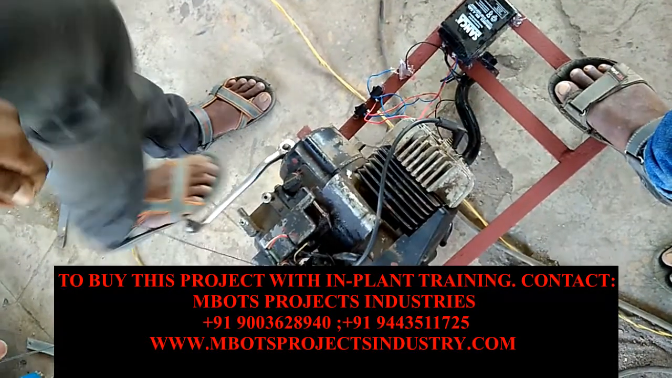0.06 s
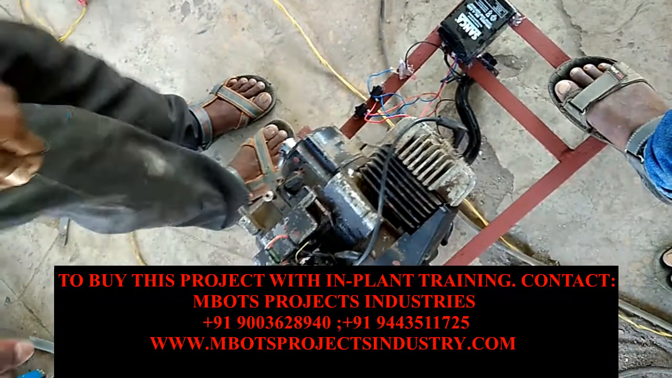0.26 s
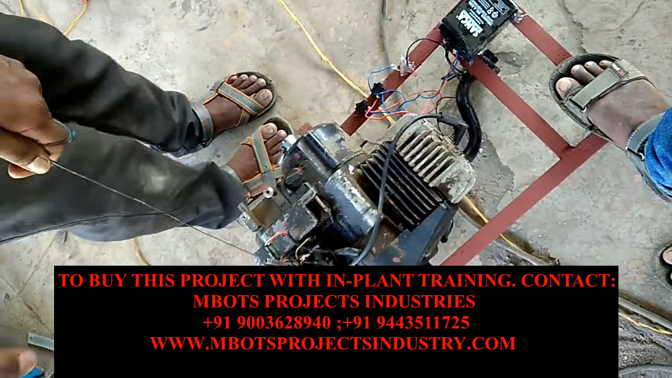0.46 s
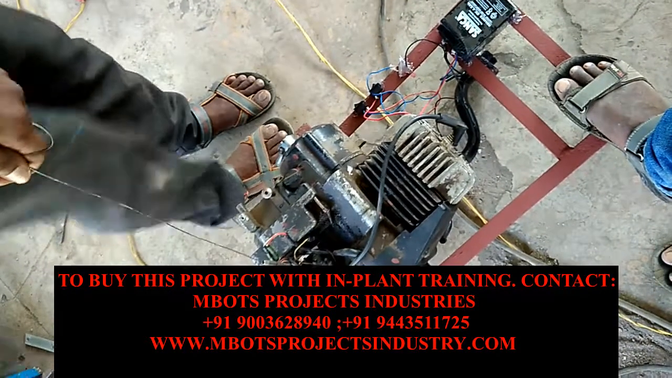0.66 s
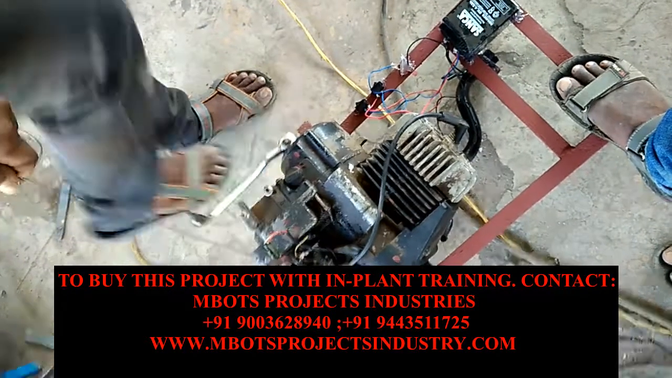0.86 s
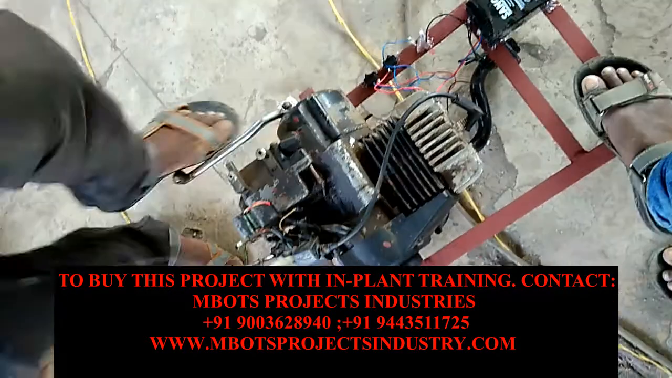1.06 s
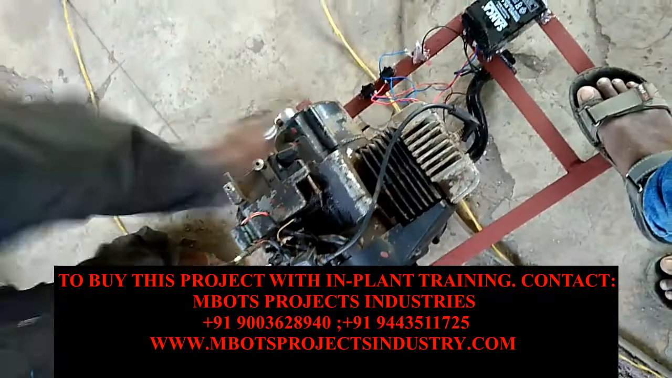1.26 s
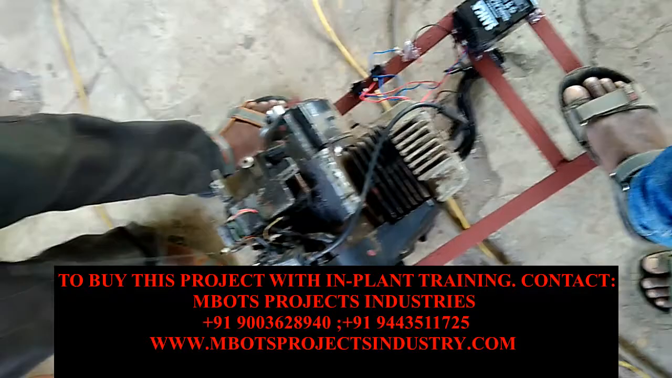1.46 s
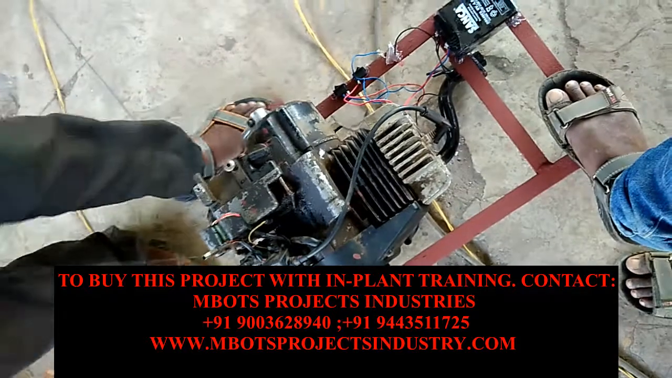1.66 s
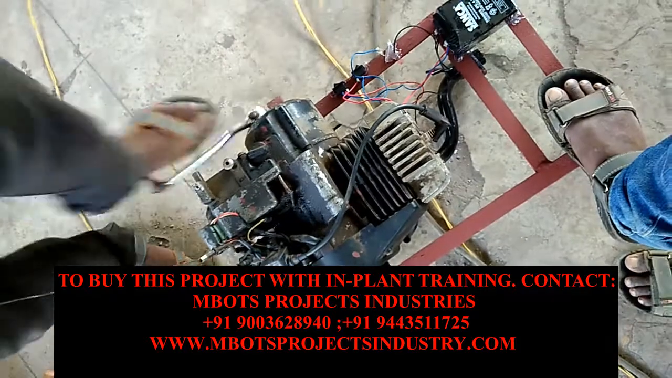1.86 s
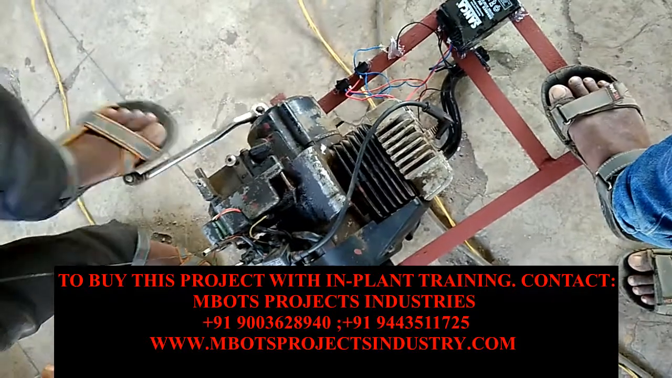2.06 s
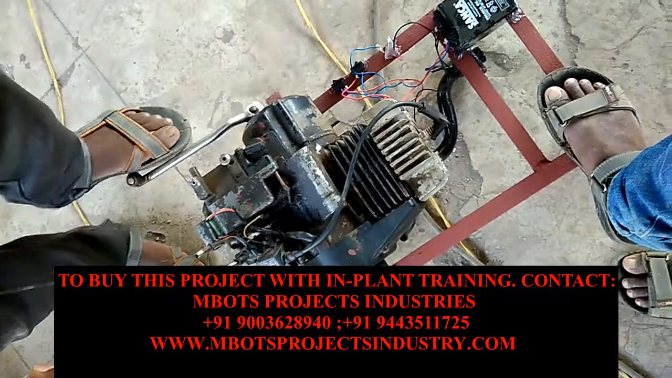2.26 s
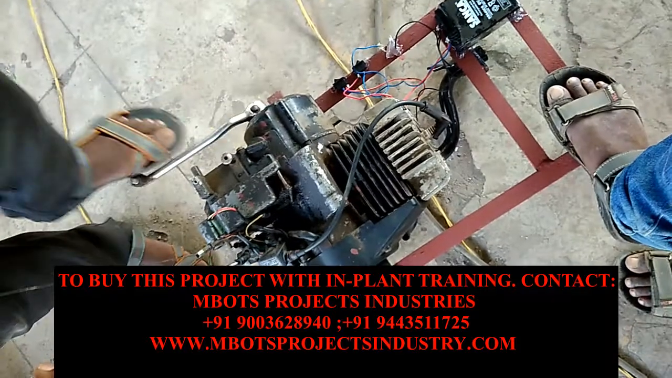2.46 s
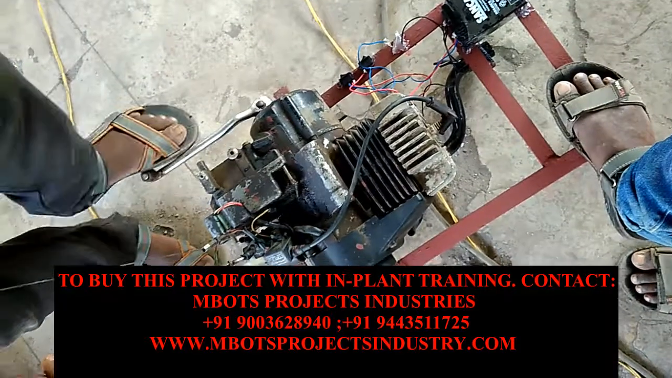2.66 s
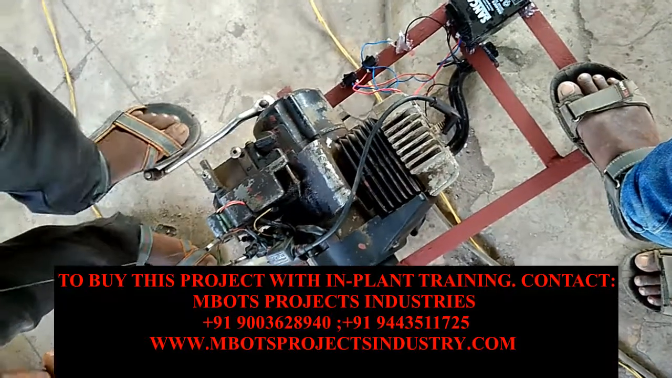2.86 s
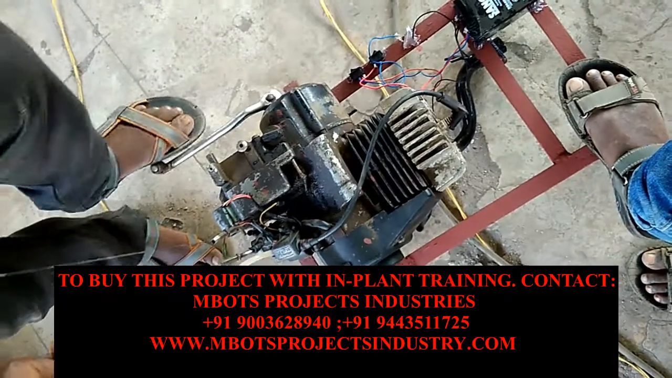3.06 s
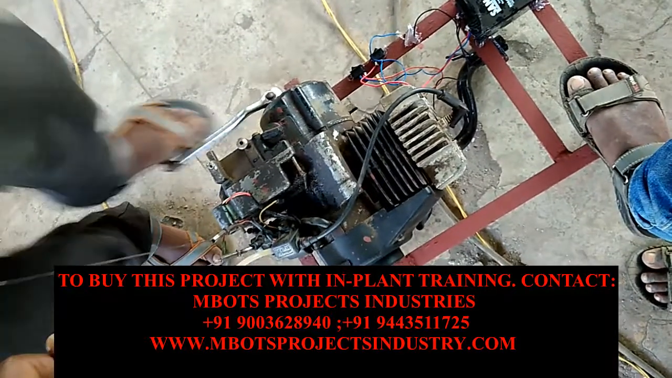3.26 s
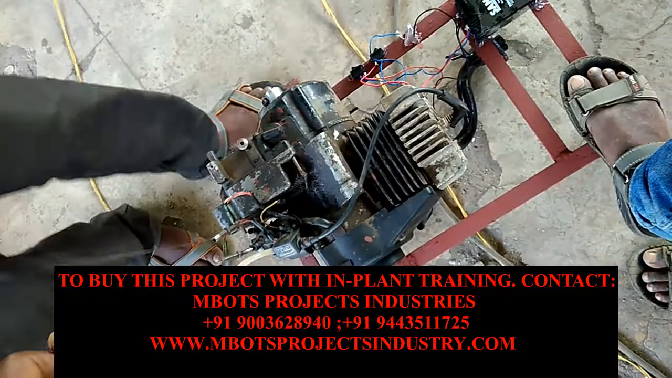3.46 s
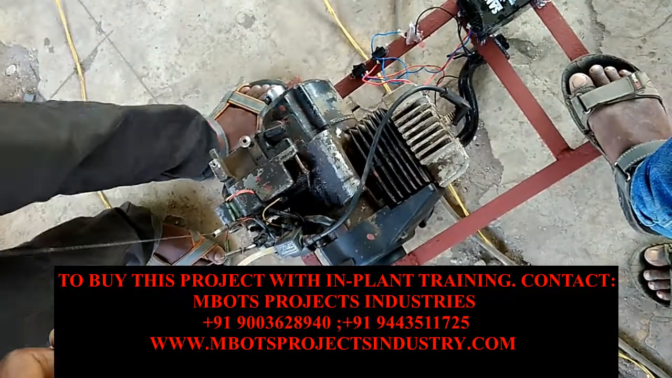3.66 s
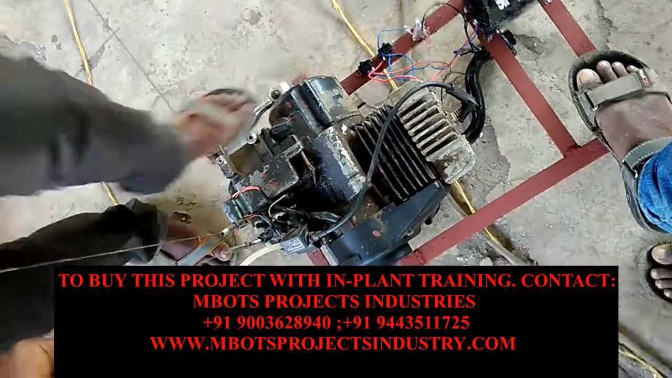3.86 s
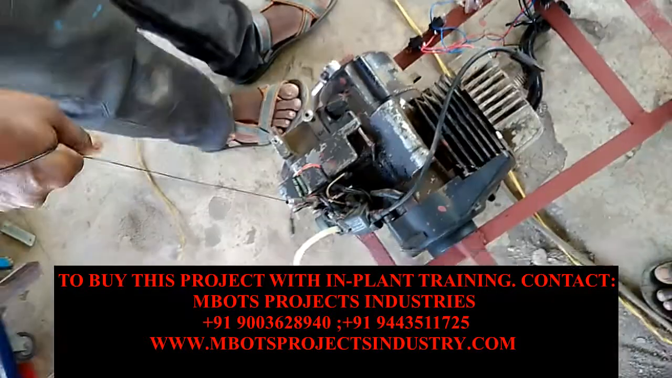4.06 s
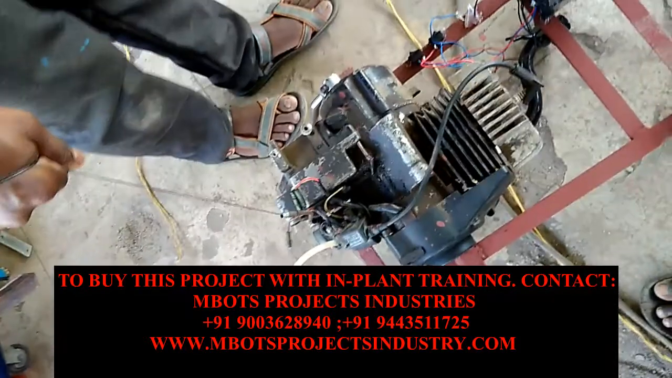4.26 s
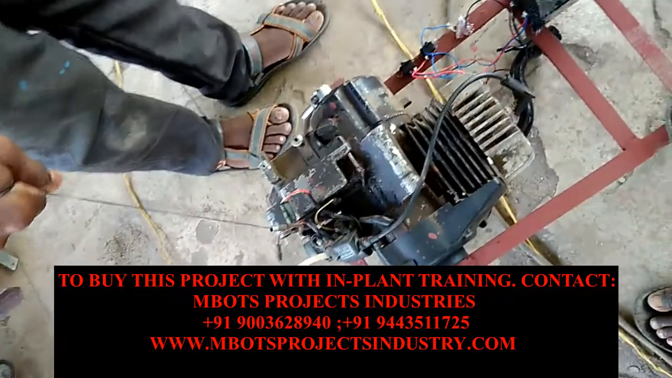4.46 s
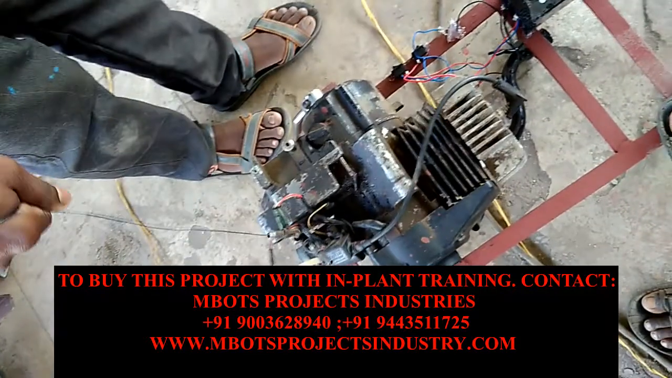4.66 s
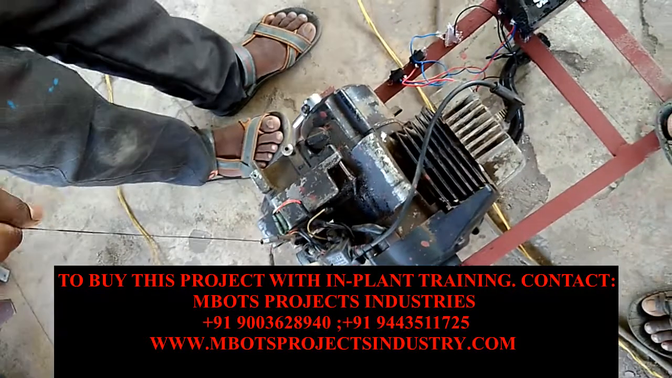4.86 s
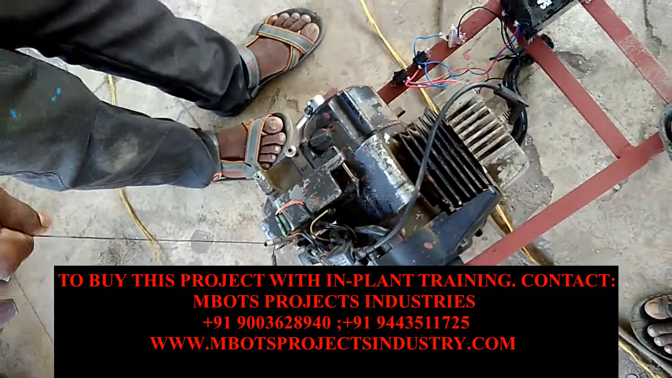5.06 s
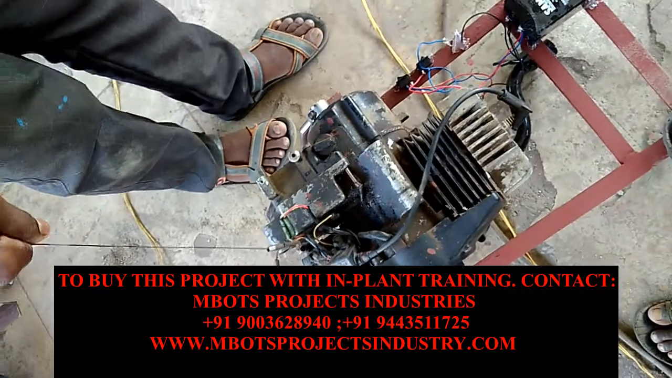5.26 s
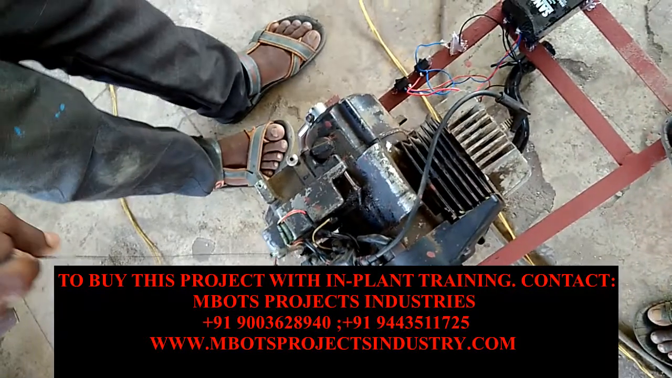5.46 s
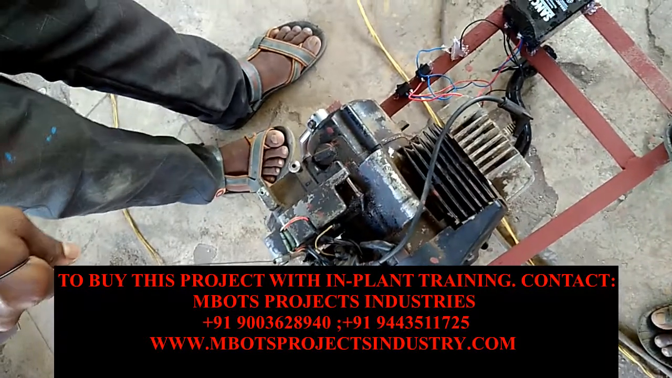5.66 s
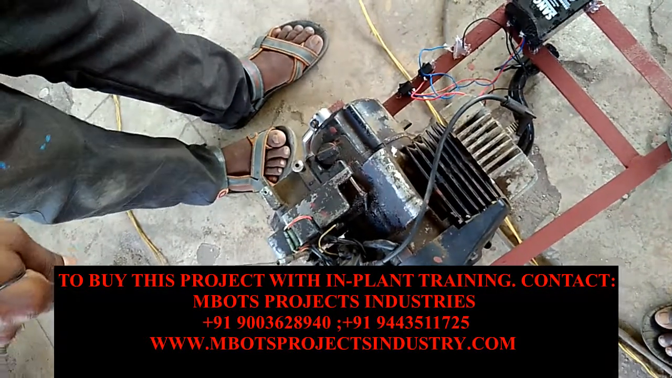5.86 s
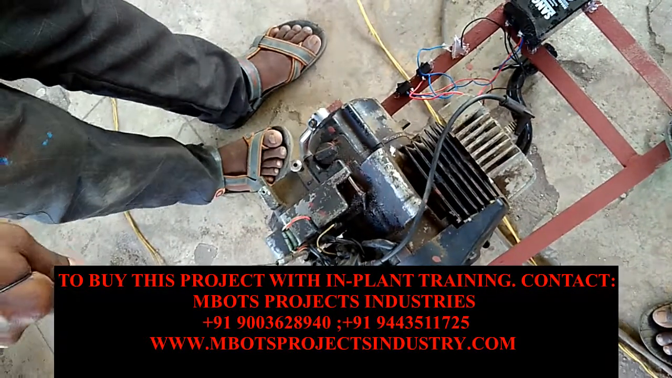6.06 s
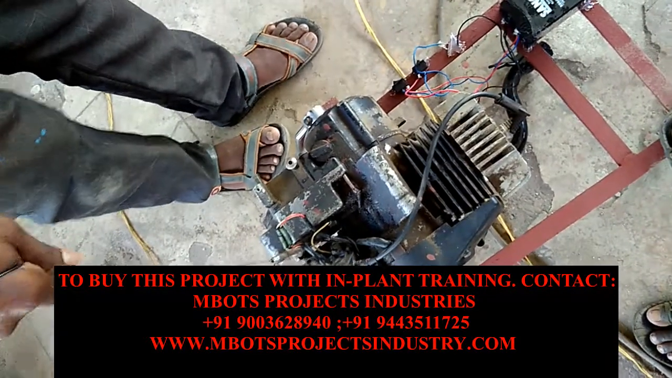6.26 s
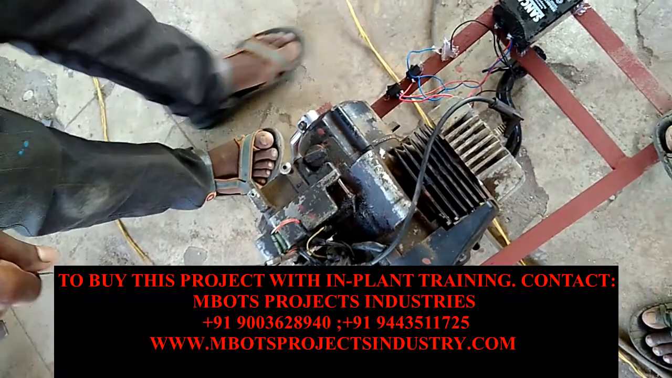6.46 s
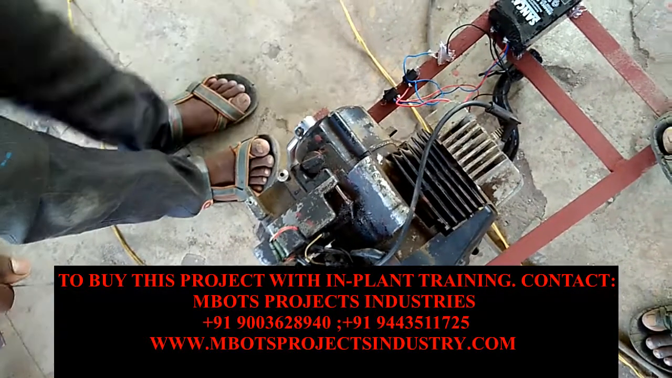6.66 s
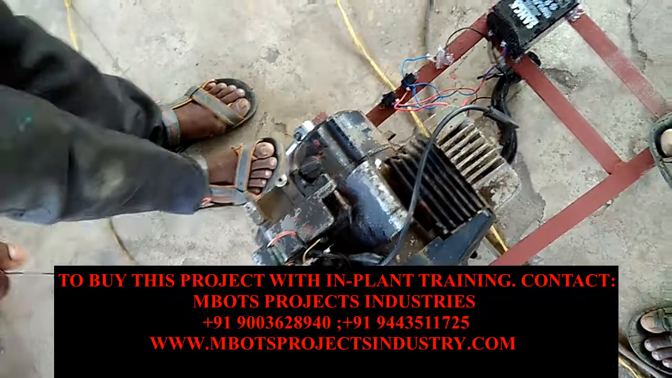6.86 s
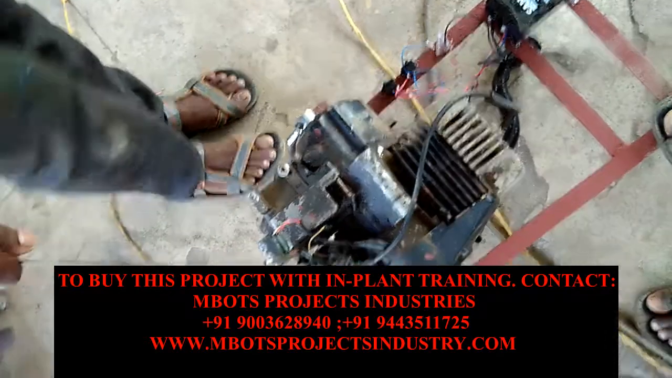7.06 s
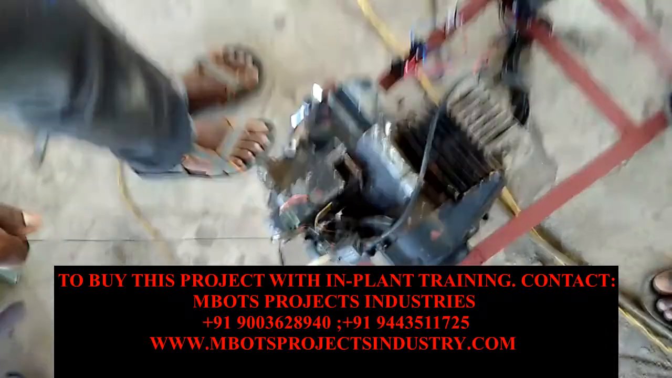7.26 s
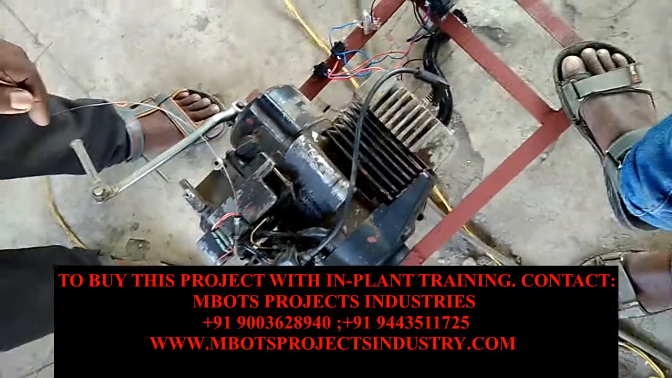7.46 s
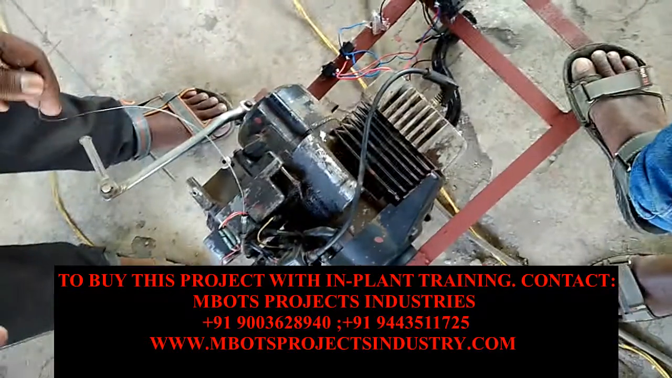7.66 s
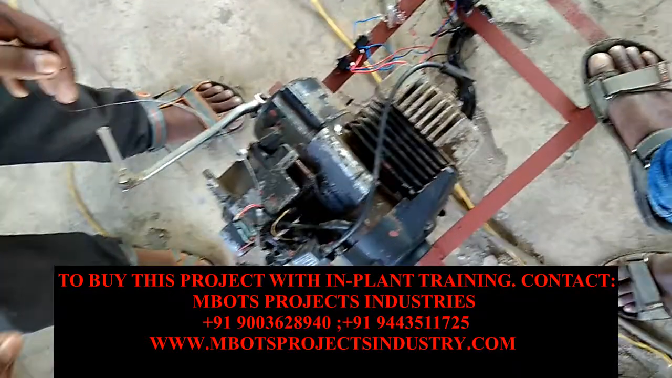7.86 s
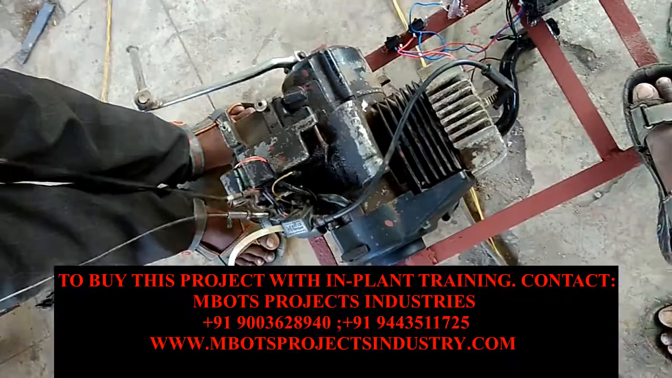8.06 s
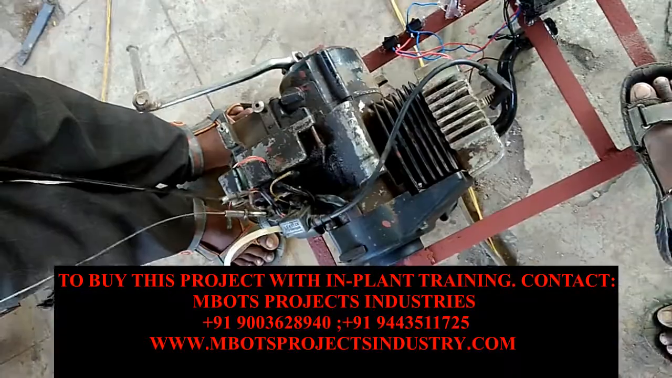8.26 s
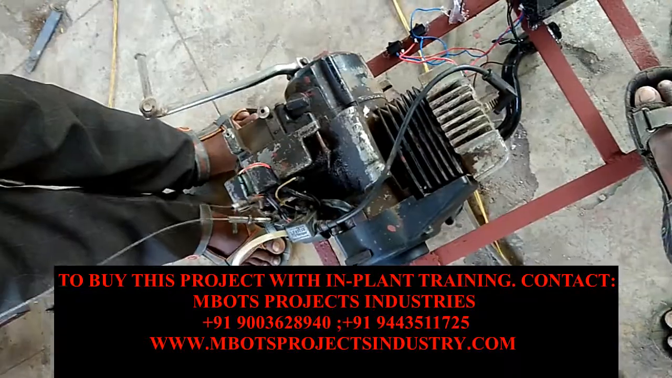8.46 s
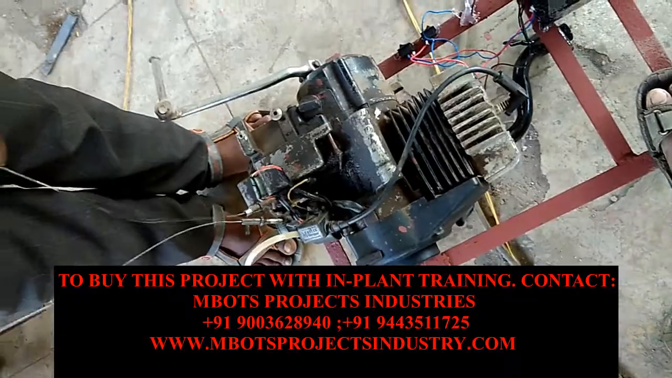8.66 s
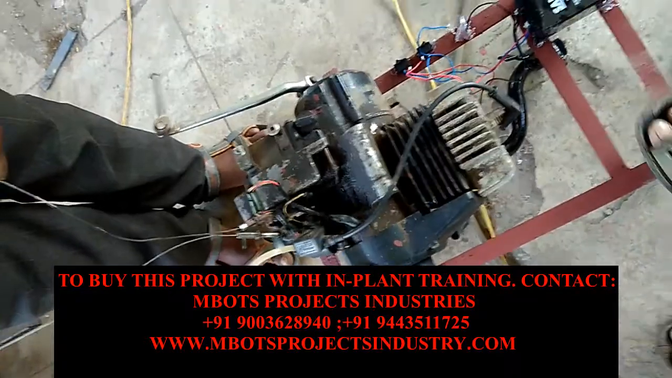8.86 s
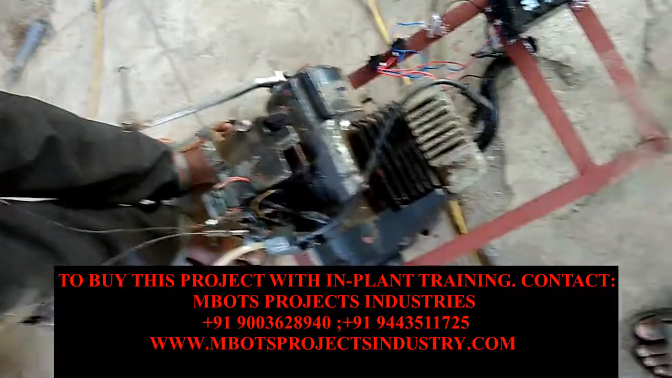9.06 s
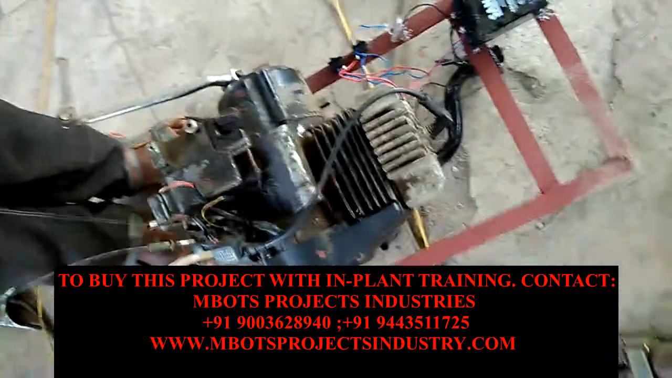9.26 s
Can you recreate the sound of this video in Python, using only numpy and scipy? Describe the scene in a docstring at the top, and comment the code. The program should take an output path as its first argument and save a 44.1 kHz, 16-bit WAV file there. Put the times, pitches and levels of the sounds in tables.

```python
"""Heard first: kicks spin a dead two-stroke engine, which thumps and whirrs while its kick lever clanks. After
the third kick it catches, runs in bursts and coasts down; at 7.3 s it is suddenly heard turning fast and
coasting once more, then runs on, on a steel stand. Piston strokes excite decaying resonances; gas flow is
coloured noise gated by the crank; exhaust jets are crackling noise; lever and stand are struck modes. A diffuse
workshop tail surrounds them all. Table levels are relative, before the mix gains; colours are noise density
against frequency."""
import sys
import numpy as np
from scipy import signal
from scipy.fft import rfft, irfft, next_fast_len
from scipy.io import wavfile
from scipy.ndimage import uniform_filter1d, map_coordinates

SR = 44100
rng = np.random.default_rng(int(sys.argv[2]) if len(sys.argv) > 2 else 0)


def master(y):
    """Save y as 16-bit WAV."""
    cut = np.clip(np.atleast_2d(y).T, -1, 1)
    pcm = np.round(cut * 32767)  # scale
    wavfile.write(sys.argv[1], SR, pcm.astype(np.int16))


N = 410571
TIME = np.arange(N) / SR

# crank speed under power, one list a run: t/s, speed/(turns/s)
RUN_SPEEDS = [
    [(4.415, 31.5), (4.7, 35.7), (4.9, 39), (5.1, 38.45), (5.25, 33.4), (5.45, 41.1), (5.68, 56.5),
     (5.8, 50.3), (5.945, 49)],
    [(8.053, 38.5), (8.2, 38), (8.45, 45), (8.65, 40.5), (9.31, 39)],
]
# freewheeling, starting on a stroke: t/s, end/s, first speed/(turns/s), thump level/dB
COASTS = [(3.968, 4.4, 43.8, -16), (5.956, 6.8, 47.74, 1), (7.311, 8.0, 44.55, 3)]
# exhaust resonances at 40 turns/s: f/Hz, width/Hz, level/dB
PIPE = [(308.3, 61, 7.5), (425, 190, -7.5), (228.3, 31, -3.5), (762, 82, -10)]
# growl of gas pumped by the piston, at 40 turns/s: f/Hz, width/Hz, level/dB
GROWL = [(248, 45, 1.5), (315, 34, -3), (397.4, 29, -1)]
# resonances of the engine block: f/Hz, width/Hz, level/dB
BLOCK = [(710, 340, -7.5), (866, 33, 4), (1220, 100, -8), (1835, 62, -7.5), (1936, 230, -10.5)]
# colour of the exhaust roar at 40 turns/s, firing: f/Hz, level/dB
ROAR = [(100, -9.5), (200, 2.5), (300, 13.5), (420, 1), (560, -6), (800, -80.5)]
# colour of the exhaust rasp: f/Hz, level/dB
RASP = [(260, -21.5), (450, 1.5), (568, -6), (632, -2), (734, -1.5), (991, -9.5), (1170, -4), (1290, -4.5),
        (1450, -13.5), (1700, -12), (2210, -34), (3740, -120)]
# colour of the mechanical clatter: f/Hz, level/dB
CLATTER = [(900, -25), (1450, 2.5), (1750, -1.5), (2100, -1), (2800, 1), (4000, -4.5), (6000, -6),
           (10000, 2), (13000, -7.5), (16000, -22)]
# colour of the hollow note of air pumped through while coasting: f/Hz, level/dB
WHISTLE = [(600, -33.5), (780, -8.5), (870, 2), (980, -9), (1150, -17), (1550, -8), (1730, 1), (1900, -10),
           (2100, -7.5), (3200, -38)]
# buzzes of the stand when the engine shakes it hard: t/s, length/s, level/dB
BUZZES = [(5.66, 0.092, -33.5), (5.88, 0.082, -40), (8.94, 0.12, -37.5), (9.18, 0.13, -34.5)]


def engine():
    """Periodic excitation: each turn strikes resonances and gates gas noise; firing adds irregularity."""
    spins = sorted(RUN_SPEEDS + [coast(*row[:3]) for row in COASTS], key=lambda rows: rows[0][0])
    strokes, _ = crank(spins)
    speed = np.interp(TIME, *strokes.T)
    thump_gain, pop_gain, rasp_gain, clatter_gain = engine_levels(spins, speed)
    # 0 without a gas jet, 1 with a strong one
    firing = np.minimum(np.sqrt(jet_power()) * amp(24.0), 1)
    coasting = 1 - firing

    thump_modes = [(106, 120, -4.5), (164, 140, -3.0)]
    thump = beats(strokes, thump_gain, thump_modes, follow=0.17, uneven_db=0.3, scatter=0.07)
    # even when coasting, ragged when firing
    thump = thump * (coasting + firing * grain(depth_db=4.5, size=700))
    pop = beats(strokes, pop_gain, PIPE, follow=0.23, uneven_db=0.5, scatter=0.044)
    growl = beats(strokes, pop_gain * (1 - .5 * firing), GROWL, follow=1, uneven_db=1, scatter=.008)
    spit = crackle(PIPE, per_s=70, spread_db=3) * pop_gain * firing
    sputter = crackle(BLOCK, per_s=220, spread_db=4) * rasp_gain * firing
    knock = beats(strokes, rasp_gain, BLOCK, follow=0, uneven_db=2, scatter=.035) * (1 - .85 * firing)

    flow = puffs(strokes, decay=0.0068, steady=.3 + .2 * firing, uneven_db=2.5)
    burning = .33 + .67 * firing
    rumble_colour = [(30, -10.5), (60, 5.0), (120, -6.0), (190, -3.5), (300, -32.5)]
    rumble = amp(-3.0) * noise(rumble_colour, same=0.99) * thump_gain * flow * np.sqrt(burning)

    # the exhaust note sinks as the engine slows, and faster once no hot gas fills the pipe
    note = (speed / 40) ** (.25 + .4 * coasting) * (1 - .08 * coasting)
    roar_flow = puffs(strokes, decay=0.012, steady=0.24, uneven_db=4.0)
    roar = amp(-1.5) * glide(noise(ROAR, same=0.93), note) * pop_gain * burning * roar_flow

    rasp = amp(2.5) * noise(RASP, same=0.41) * rasp_gain * flow
    rasp = rasp * (0.46 + 0.54 * firing) * grain(depth_db=0.5, size=90)
    rasp = churn(rasp, depth_db=3, width_hz=170, hold_s=.035)

    rattle = puffs(strokes, decay=0.012, steady=.3 + .3 * firing, uneven_db=2.5)
    rattle = rattle * grain(depth_db=1.5, size=40)
    clatter = noise(CLATTER, same=0.13) * clatter_gain * rattle
    clatter = churn(clatter, depth_db=3.2, width_hz=350, hold_s=.045)

    buzz_colour = [(400, -53.5), (520, -5.0), (600, 1.5), (660, 2.5), (750, -18.0), (950, -63)]
    buzz = noise(buzz_colour, same=1.0) * shakes(BUZZES)
    buzz = buzz * puffs(strokes, decay=.009, steady=.08, uneven_db=1.5)
    whistle_gain = (rasp_gain + amp(-15.5) * pop_gain) * (0.26 + 0.55 * flow) * coasting
    whistle = amp(-3.5) * noise(WHISTLE, same=0.14) * whistle_gain

    body = amp(-3.5) * thump + amp(-5) * growl + rumble
    exhaust = amp(-11) * pop + amp(-6.0) * spit + amp(-11.5) * sputter + amp(-14.5) * knock
    exhaust = exhaust + roar + rasp + whistle + buzz
    mechanical = amp(4.5) * workshop(clatter, wet_db=-6.5)
    return workshop(body, wet_db=-5.5) + workshop(exhaust, wet_db=-5.0) + mechanical


# bursts of firing: t/s, rise/s, length/s, then thump, pop, rasp and clatter level/dB, t60 of the pop/s
FIRINGS = [(3.958, 0.0063, 0.048, -33.5, -25.5, -33.5, -33.5, 1.4),
           (4.396, 0.11, 0.13, -48.5, -31, -34, -30.5, 1),
           (4.595, 0.0068, 0.52, -41.5, -30.5, -34, -34.5, 1.18),
           (5.16, .03, 0.26, -58.5, -38, -41.5, -42, 0.31),
           (5.317, 0.0037, .41, -36.5, -34, -34, -32, 0.12),
           (5.606, 0.015, 0.12, -54, -59, -36.5, -40, 0.12),
           (5.836, 0.02, 0.12, -42, -47, -39.5, -41, 0.14),
           (5.889, 0.0085, 0.073, -33, -35, -57, -58, 0.18),
           (8.043, .004, 0.096, -64, -41.5, -40.5, -45, 0.36),
           (8.139, 0.11, 0.42, -41, -41.5, -39, -39.5, 0.37),
           (8.649, 0.0038, 0.084, -44, -45.5, -47, -39.5, 0.43),
           (8.782, 0.024, 0.57, -53, -49, -47.5, -45.5, 0.5),
           (9.128, 0.011, 0.038, -39, -61, -47, -40, 0.55)]
# mere turning, a row each for thump, pop, rasp, clatter:
# level at the resonant speed without shaking/dB, slope/(dB/octave of speed), change by shaking/dB
TURNING = [(-50.5, 1, 14.5), (-46.5, 11.5, -7), (-54.5, 6, 3.5), (-59, 6, 1)]
# the stand resonates at one crank speed
SHAKE_TURNS_PER_S, SHAKE_OCTAVES = 30.36, 0.3
THUMP_T60_S, RASP_T60_S, CLATTER_T60_S = 0.083, 0.59, 0.25


def engine_levels(spins, speed):
    """Forced vibration: four gains vary with speed and leap at each burst of firing;
    near the stand's resonance the thump swells and the pop weakens."""
    turning = sum((TIME >= rows[0][0]) & (TIME < rows[-1][0]) for rows in spins) > 0
    octaves = np.log2(speed / SHAKE_TURNS_PER_S)
    shaking = np.exp(-.5 * (octaves / SHAKE_OCTAVES) ** 2)
    power = np.array([turning * amp(db + slope * octaves + shake_db * shaking) ** 2
                      for db, slope, shake_db in TURNING])
    for s, end, _, thump_db in COASTS:
        power[0, round(s * SR):round(end * SR)] *= amp(thump_db) ** 2
    for s, rise, length, *dbs, pop_t60 in FIRINGS:
        t = TIME[:round((length + .6) * SR)]
        t60 = np.array([[THUMP_T60_S], [pop_t60], [RASP_T60_S], [CLATTER_T60_S]])
        level_db = np.array(dbs)[:, None] - 60 * np.maximum(t - length, 0) / t60
        add(power, s, np.minimum(t / rise, 1) * amp(level_db) ** 2)
    return np.sqrt(power)


FRICTION_TURNS_PER_S2, CRAWL_TURNS_PER_S = 57, 9


def coast(start, end, speed):
    """Constant deceleration by friction, down to a last crawl: rows of t/s, speed/(turns/s)."""
    s = np.linspace(start, end, num=64)
    return np.column_stack([s, np.maximum(speed - FRICTION_TURNS_PER_S2 * (s - start), CRAWL_TURNS_PER_S)])


# colour of the strong gas jets: f/Hz, level/dB
HISS = [(2500, -53), (4300, -29.5), (5500, -12), (7200, -10), (8600, -4), (9700, 1), (10300, 3.5),
        (11200, -1.5), (12500, -6.5), (14000, -7.5), (16000, -14.5)]


def hiss():
    """Jet noise: broadband turbulence with fine crackle and shifting colour; weak jets sound lower."""
    jet = np.sqrt(jet_power())
    soft_colour = [(1800, -36.0), (2800, 3.5), (4100, -12.0), (5000, 2.0), (6000, 3.0), (7500, -36.5)]
    # the low part stops growing in strong jets
    soft = noise(soft_colour) * np.minimum(jet * amp(-7.5), amp(-50.5))
    gas = churn(noise(HISS, same=0.024), depth_db=2.5, width_hz=260, hold_s=.06)
    return (amp(2.5) * gas * jet + soft) * grain(depth_db=1.0, size=25)


# spurts of hissing gas: t/s, length/s, level/dB, t60/s
SPURTS = [(1.719, 0.051, -54.5, 0.22), (3.738, 0.0097, -49, 0.095), (3.961, 0.064, -25, 0.3685),
          (4.401, 0.8, -24, 0.36), (5.253, 0.022, -30, 0.29), (5.297, 0.0038, -20.5, 0.065),
          (5.324, 0.391, -24.5, 0.32), (5.847, 0.099, -23, 0.21), (6.155, 0.016, -31, 0.25),
          (6.326, .03, -50.5, 0.17), (6.519, 0.0033, -47, 0.15), (6.591, 0.0056, -55.5, 0.14),
          (6.63, 0.014, -47.5, 0.22), (6.744, 0.014, -43, 0.16), (6.934, 0.069, -62, 0.1),
          (7.423, 0.052, -42, 0.36), (7.544, 0.011, -45, 0.099), (7.617, 0.055, -48, 0.36),
          (7.813, 0.0235, -40.5, 0.15), (8.042, 0.054, -23, 0.43), (8.151, .44, -23.3, 0.17),
          (8.654, 0.061, -23, 0.3), (8.779, 0.1994, -23.5, 0.16), (9.016, 0.0067, -25.5, 0.1),
          (9.064, 0.048, -25, 0.37), (9.138, 0.15, -23.5, 0.19)]


def jet_power():
    """Additive power of gas jets: each rises within 3 ms, holds its length and decays exponentially."""
    power = np.zeros(N)
    for s, length, db, t60 in SPURTS:
        t = TIME[:round((length + .5) * SR)]
        decayed_db = db - 60 * np.maximum(t - length, 0) / t60
        add(power, s, (amp(decayed_db) * np.minimum(t / 0.003, 1)) ** 2)
    return power


# crank speed, one list a kick, each starting on a piston stroke: t/s, speed/(turns/s)
KICK_SPEEDS = [
    [(.205, 17.6), (.347, 10.7), (.585, 6.2), (.75, 2.3)],
    [(1.313, 19), (1.38, 11.8), (1.485, 7.8), (1.85, 8.2)],
    [(3.427, 20.3), (3.487, 13), (3.577, 9.3), (3.92, 4.6)],
]
# colour of the gear whirr: f/Hz, level/dB
GEARS = [(150, -18), (250, -10.5), (414, -7), (710, -23), (906, -17), (2200, -19), (2490, -10), (3710, -19),
         (5070, -17.5), (6940, -25), (7700, -15.5), (10200, -7), (12100, -20.5), (13900, -19.5),
         (16000, -34.5)]
# ticking of the starter's teeth: f/Hz, width/Hz, level/dB
RATCHET = [(1850, 220, 5), (3370, 260, 4.5), (4900, 510, 8)]


def kicks():
    """Impulsive excitation: the unfired engine thumps each stroke; crank angle modulates the gear whirr."""
    strokes, angle = crank(KICK_SPEEDS)
    thump_gain, whirr_gain = kick_levels()
    thump_modes = [(107, 76, -5.5), (152.6, 99, -10), (225, 76, -13.5)]
    thump = beats(strokes, thump_gain, thump_modes, follow=0.042, uneven_db=5.0, scatter=.04)
    chuff_colour = [(60, -12.0), (110, 2.5), (300, -2.5), (600, -13.0), (1200, -9.5), (2500, -29)]
    chuff = noise(chuff_colour, same=0.97) * thump_gain
    swell = 1 - 0.1 * np.cos(2 * np.pi * (angle + 0.046))
    gears = churn(noise(GEARS, same=0.041), depth_db=3.5, width_hz=350, hold_s=.05)
    teeth = crackle(BLOCK + RATCHET, per_s=240, spread_db=5)
    whirr = (gears * grain(depth_db=2.0, size=130) + amp(-12.5) * teeth) * whirr_gain * swell
    low = workshop(amp(-6.0) * thump + amp(-10.0) * chuff, wet_db=-10.5)
    return low + amp(3.5) * workshop(whirr, wet_db=1.0)


# one row a kick: slack taken up/s, whirr meanwhile: relative level/dB,
# piston thump level/dB, gear whirr level/dB, run-down of the whirr/(dB/s)
KICKS = [(0.097, -25, -26.5, -34.5, 58), (0.099, -9, -25.5, -38, 55), (0.096, -11.5, -25.5, -35, 48)]
KICK_BITE_S, KICK_LEAD_S, KICK_STOP_S = 0.009, .018, 0.13
THUMP_FADE = 1.29  # thumps fade this many times as fast as the whirr


def kick_levels():
    """Exponential run-down: the foot takes up slack, the ratchet bites, and thump and whirr decay."""
    thump, whirr = np.zeros(N), np.zeros(N)
    for speeds, (slack, slack_db, thump_db, whirr_db, fade) in zip(KICK_SPEEDS, KICKS):
        age = TIME - speeds[0][0]
        bite = np.clip((age + KICK_LEAD_S) / KICK_BITE_S, 0, 1)
        stop = np.clip((speeds[-1][0] - TIME) / KICK_STOP_S, 0, 1)
        fade_db = -fade * np.maximum(age, 0)
        thump += amp(thump_db + THUMP_FADE * fade_db) * bite * stop
        whirr += amp(whirr_db + fade_db) * np.maximum(bite, amp(slack_db) * (age > -slack)) * stop
    return thump, whirr


# clanks of lever and ratchet: t/s, peak level/dB, treble and clunk relative level/dB, t60 of the rattle/s
CLANKS = [(0.1477, -46.5, 0, -20, 0.073), (0.181, -41, -26, 9, 0.03), (0.256, -22.5, -4.5, -3, 0.11),
          (0.299, -38, 9, -19, 0.068), (0.3887, -40.5, 6.5, -12, 0.1), (0.5127, -41.5, -1, -20, 0.08),
          (0.8051, -40, -9, -5.5, 0.11), (0.849, -38, -4, -27, 0.037), (.885, -51.5, -5.5, -26.5, 0.22),
          (1.166, -44, -24, -38, 0.092), (1.217, -40, -11, -27.5, 0.091), (1.234, -26, -11, -27, 0.036),
          (1.309, -32, -2, 10, 0.049), (1.335, -21.5, -9.5, 14, 0.037), (1.4687, -40, 1, 2, 0.059),
          (1.478, -39, 4, 8, 0.051), (1.593, -36.5, -1.5, -24, 0.051), (1.93, -65, -16, -23, 0.29),
          (2.174, -44, -8, -33.5, 0.065), (2.186, -36, -8, -20, 0.038), (2.2085, -42.5, -10, -13, 0.12),
          (2.438, -48, -7.5, -28.5, 0.11), (2.566, -44.5, -12, -32.5, 0.064), (2.577, -36, -10, -21, 0.033),
          (2.596, -44.5, -8, -21, 0.16), (3.2904, -52.5, -16.5, -39, 0.15), (3.336, -32, -4.5, -30, 0.057),
          (3.345, -28.5, -17, -20, 0.069), (3.452, -22, -6, 2.5, 0.08), (3.465, -19.5, -7, -16, 0.041),
          (3.573, -25, -13, -17, 0.027), (3.678, -38.5, -0.5, -10, 0.041),
          (6.9275, -55, 10.5, -33.5, 0.076), (7.0708, -69, -22, 1, 0.047),
          (7.109, -67.5, -28, -20.5, 0.059), (8.0254, -48.5, 10.5, -15, 0.06)]
# resonances of the kick lever: f/Hz, width/Hz, level/dB
LEVER = [(1320, 300, -3.5), (1890, 230, 0.5), (2300, 240, 7), (2600, 320, 16.5), (3040, 210, 17),
         (3380, 330, 10.5), (4400, 360, 1.5)]
STRIKE_SPREAD_DB, STRIKE_DETUNE = 3, .04
LEVER_LOW_HZ = 1044


def lever():
    """Modal impact: steel contacts ring detuned modes, with a bright edge and a clunk in the crankcase."""
    rung, edge, heavy = np.zeros((2, N)), np.zeros(N), np.zeros(N)
    t = TIME[:SR // 4] - .02
    for s, db, treble_db, clunk_db, t60 in CLANKS:
        # each clank's rattle dies away at its own rate
        blow = amp(db + np.where(t < .001, -20 + 60 * t / .02, -60 * t / max(t60, .005)))
        metal = 0
        for (hz, width, mode_db), (a, b) in zip(LEVER, rng.standard_normal((len(LEVER), 2))):
            mode_gain = amp(mode_db + STRIKE_SPREAD_DB * a) * np.sqrt(width)
            metal = metal + mode_gain * ring(TIME[:SR // 20], hz * (1 + STRIKE_DETUNE * b), width)
        flutter = unit(amp(1.1 * unit(uniform_filter1d(rng.standard_normal(len(t)), 50))))
        chatter = blow * flutter * rng.standard_normal((2, len(t)))
        add(rung, s + t[0], signal.fftconvolve(chatter, metal[None] / np.linalg.norm(metal), axes=1))
        add(edge, s + t[0], blow * amp(treble_db))
        add(heavy, s + t[0], blow * amp(clunk_db))
    rung = signal.sosfilt(signal.butter(2, LEVER_LOW_HZ, "highpass", fs=SR, output="sos"), rung)
    bright_colour = [(2000, -18.5), (5000, 0.0), (7000, -8.5), (10000, 3.5), (12500, -11.0), (16000, -20.0)]
    bright = noise(bright_colour) * edge
    clunk_colour = [(300, -24.0), (750, 1.0), (1300, 4.0), (1700, -2.5), (2500, -20.0)]
    clunk = noise(clunk_colour, same=0.07) * heavy
    return workshop(amp(-2.0) * rung + amp(2.5) * bright + amp(-8.5) * clunk, wet_db=-4.5)


# dull low knocks of the foot and sandal: t/s, level/dB, upper ring relative level/dB
KNOCKS = [(1.09, -34, -23), (1.17, -54, -5.5), (2.204, -64, 3.5), (2.61, -57.5, -1.5), (2.692, -47, -13.5),
          (2.744, -58, -9), (2.772, -57, -4), (2.796, -41.5, -14.5), (2.947, -62.5, -2.5), (3.072, -49, -9),
          (8.372, -25, -15.5), (8.827, -29, -3), (8.88, -33, -14), (9.148, -22, -15)]
# the lever's spring sings when it snaps back: t/s, length/s, level/dB
SPRING = [(1.235, 0.028, -50.5), (2.2, 0.048, -59.5), (2.594, 0.052, -59), (3.345, 0.03, -51)]
# a sandal scuffs the floor: t/s, length/s, level/dB
SCUFFS = [(2.79, 0.17, -71)]


def foot_and_spring():
    """Damped modes and narrowband noise: the foot knocks dully, the lever's spring sings, the foot scuffs."""
    boom, t = np.zeros(N), TIME[:SR // 5]
    pitches = 1 + 0.17 * rng.standard_normal((len(KNOCKS), 4))
    for (s, db, upper_db), pitch in zip(KNOCKS, pitches):
        upper = 1.3 * ring(t, 135 * pitch[1], 45) + 2.0 * ring(t, 205 * pitch[2], 49)
        upper += 0.65 * ring(t, 345 * pitch[3], 60)
        knock = ring(t, 53 * pitch[0], 27) + amp(upper_db) * upper
        add(boom, s, amp(db) * np.minimum(t / 0.007, 1) * knock)
    song_colour = [(450, -60.0), (545, -12.5), (595, 7.5), (645, -2), (710, -21), (850, -59.5)]
    song = noise(song_colour, same=0.83) * shakes(SPRING)
    scuff_colour = [(400, 0.0), (1000, -2.0), (1800, 1.0), (3000, -14.0), (8000, -37)]
    scuff = noise(scuff_colour, same=.3) * shakes(SCUFFS) * grain(depth_db=4.5, size=600)
    return workshop(amp(7.0) * boom + song + scuff, wet_db=-3.5)


# colour of the background: f/Hz, level/dB
FLOOR = [(15, -27), (25, -5.5), (92, -5), (145, -18.5), (373, -23.5), (451, -28.5), (5000, -37.5),
         (7710, -34), (11000, -36), (16000, -47)]


def background():
    """Stationary noise: the quiet workshop, steady throughout."""
    return amp(-76.0) * noise(FLOOR, same=0.17)


# reverberation of the workshop: f/Hz, t60/s
ROOM = [(100, 0.22), (300, 0.41), (1400, 0.17), (3500, 0.24), (10000, 0.032), (16000, 0.42)]


def workshop(x, wet_db):
    """Reverberation: direct sound plus decaying sparse reflections, different in each ear."""
    taps = rng.choice([-1., 1.], (2, SR // 2)) * (rng.random((2, SR // 2)) < .06)
    taps = taps * (TIME[:SR // 2] > .003)
    hz, t, z = signal.stft(taps, SR, nperseg=256)
    tail = signal.istft(z * amp(-60 * t / read(ROOM, hz)[:, None]), SR, nperseg=256)[1]
    wet = signal.oaconvolve(np.atleast_2d(x), tail / np.linalg.norm(tail[0]), axes=1)[:, :N]
    # keeps the power about the same
    return (x + amp(wet_db) * wet) / np.sqrt(1 + amp(wet_db) ** 2)


def crank(speeds):
    """Phase integration: strokes as (t/s, speed/(turns/s)), and the part of a turn since the last one."""
    strokes, angle = [], np.zeros(N)
    for rows in speeds:
        s, speed = np.transpose(rows)
        live = (TIME >= s[0]) & (TIME <= s[-1])
        turns = np.cumsum(np.interp(TIME[live], s, speed)) / SR
        at = np.interp(np.arange(np.ceil(turns[-1])), turns, TIME[live])
        strokes += zip(at, np.interp(at, s, speed))
        angle[live] = turns % 1
    return np.array(strokes), angle


PORT_OPENS_S = .0014  # at 40 turns/s


def beats(strokes, gain, modes, follow, uneven_db, scatter):
    """Modal excitation per stroke: a slower piston opens the port more slowly; modes follow its speed."""
    out, t = np.zeros(N), np.arange(SR // 12) / SR
    for (s, speed), chance in zip(strokes, rng.standard_normal((len(strokes), len(modes) + 1))):
        pitch = (speed / 40) ** follow * (1 + scatter * chance[1:])
        beat = -sum(amp(db) * ring(t, hz * p, width) for (hz, width, db), p in zip(modes, pitch))
        opening = PORT_OPENS_S * np.sqrt(40 / max(speed, 8))
        beat *= 1 - np.exp(-(t / opening) ** 2)
        size = gain[min(round((s + .004) * SR), N - 1)] * amp(uneven_db * chance[0])
        # keeps the mean power alike at any stroke rate
        size *= np.sqrt(SR / max(speed, 10))
        add(out, s - .0015, size * beat / np.linalg.norm(beat))
    return out


def puffs(strokes, decay, steady, uneven_db):
    """Pulsating flow: an uneven puff at each stroke over a steady share; mean power about 1."""
    power, t = np.zeros(N), np.arange(SR // 8) / SR
    for (s, speed), chance in zip(strokes, rng.standard_normal(len(strokes))):
        puff = 4 * t / decay * np.exp(-2 * t / decay) / (decay * max(speed, 8))
        add(power, s - .003, amp(uneven_db * chance) ** 2 * puff)
    steady = np.clip(steady, 0, 1)
    return np.sqrt(steady + (1 - steady) * power)


def crackle(modes, per_s, spread_db):
    """Shot noise: random ticks of uneven size, each ringing one of the modes."""
    size = amp(spread_db * np.minimum(rng.exponential(1, N), 3)) * (rng.random(N) < per_s / SR)
    which, out = rng.integers(0, len(modes), N), np.zeros(N)
    ticks = [amp(db) * np.sqrt(width) * ring(TIME[:SR // 20], hz, width) for hz, width, db in modes]
    for n in np.flatnonzero(size):
        add(out, TIME[n], size[n] * ticks[which[n]])
    return unit(out)


def churn(x, depth_db, width_hz, hold_s):
    """Time-frequency modulation: random patches of the spectrum swell and sink; mean gain power is 1."""
    hz, t, z = signal.stft(x, SR, nperseg=512)
    field = rng.standard_normal(size=(300, 900))
    places = np.meshgrid(hz / width_hz, t / hold_s, indexing="ij")
    patches = map_coordinates(field, places, order=1, mode="wrap")
    return signal.istft(z * unit(amp(depth_db * unit(patches))), SR, nperseg=512)[1][..., :N]


def grain(depth_db, size):
    """Amplitude modulation: fast random flutter of a level, smoothed over size samples."""
    return unit(amp(depth_db * unit(uniform_filter1d(rng.standard_normal(N), size))))


def shakes(rows):
    """Envelope shaping: soft-edged swells of vibration."""
    gain = np.zeros(N)
    for s, length, db in rows:
        add(gain, s, amp(db) * signal.windows.tukey(round(length * SR), .5))
    return gain


def glide(x, ratio):
    """Frequency scaling: plays noise faster or slower, so that its colour follows a curve."""
    at = np.cumsum(ratio) % (N - 1)
    return np.array([np.interp(at, np.arange(N), ear) for ear in x])


def ring(t, hz, width):
    """Damped free oscillation: bandwidth sets the exponential decay."""
    return np.sin(2 * np.pi * hz * t) * np.exp(-np.pi * width * t)


def noise(colour, same=0.):
    """Spectral shaping with partial coherence: two coloured channels share a part of their power."""
    bins = next_fast_len(N // 2 + 1) + 1
    z = rng.standard_normal((3, 2 * bins)).view(complex)
    same = np.clip(same, 0, 1)
    pair = np.sqrt(same) * z[2] + np.sqrt(1 - same) * z[:2]
    return unit(irfft(pair * amp(read(colour, np.linspace(0, SR / 2, bins))))[:, :N])


def read(points, hz):
    """Interpolation of a spectrum table on a log-frequency axis."""
    f, value = np.transpose(points)
    return np.interp(np.log(hz + 1), np.log(f), value)


def add(mix, s, sound):
    """Superposition: mixes a sound in at time s."""
    part = mix[..., max(round(s * SR), 0):][..., :sound.shape[-1]]
    part += sound[..., :part.shape[-1]]


def amp(db):
    """Logarithmic level: decibels to amplitude gain."""
    return 10 ** (np.asarray(db) / 20)


def unit(x):
    """Normalisation to an rms of 1."""
    return x / np.sqrt(np.mean(x ** 2) + 1e-20)


# stereo balance: f/Hz, left over right level/dB
LEAN = [(40, -1.5), (120, 4.5), (270, 3), (400, 7), (650, 0.5), (1200, 3.5), (2300, 11), (4400, 0.5),
        (8000, 2.5), (15000, 0.1)]


def scene():
    """Superposition with interaural level difference: all sources sum, mostly a little to the left."""
    mix = engine() + hiss() + kicks() + lever() + foot_and_spring() + background()
    size = next_fast_len(N)
    lean_db = read(LEAN, np.fft.rfftfreq(size, 1 / SR))
    return irfft(rfft(mix, size) * amp(np.array([lean_db, -lean_db]) / 2), size)[:, :N]


BASS_CUT_HZ, EDGE_HZ = 77.6, 16000


def record(dry):
    """Band limitation: the microphone's bass roll-off and the recorder's upper limit."""
    thinned = signal.sosfilt(signal.butter(2, BASS_CUT_HZ, "highpass", fs=SR, output="sos"), dry)
    band_limit = signal.firwin(401, EDGE_HZ, window=("kaiser", 9), fs=SR)
    return signal.oaconvolve(thinned, band_limit[None], "same")


dry = scene()
out = record(dry)
master(out)
```